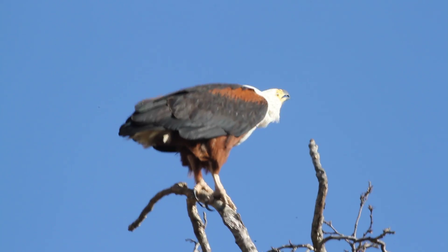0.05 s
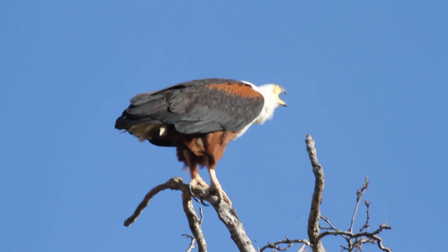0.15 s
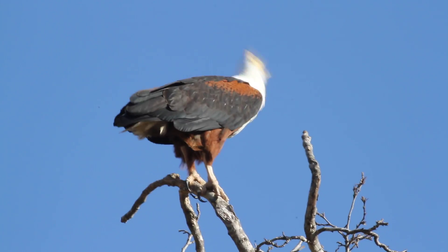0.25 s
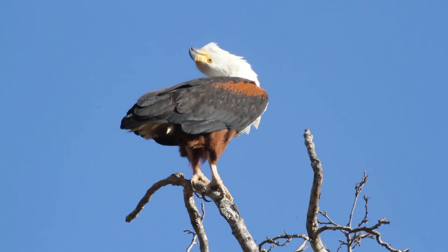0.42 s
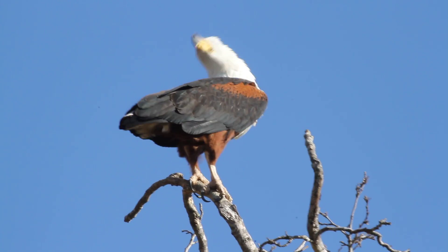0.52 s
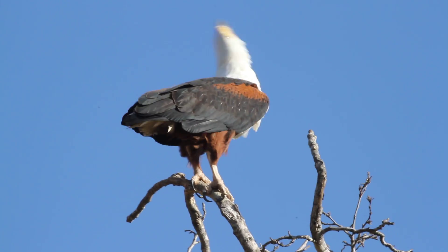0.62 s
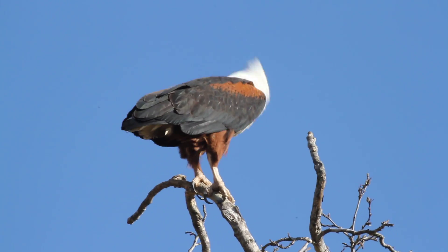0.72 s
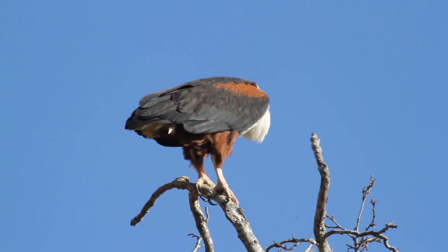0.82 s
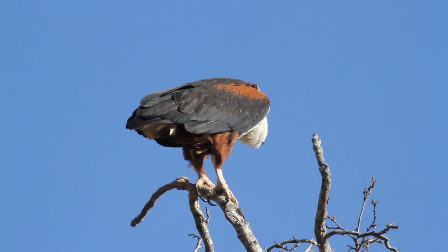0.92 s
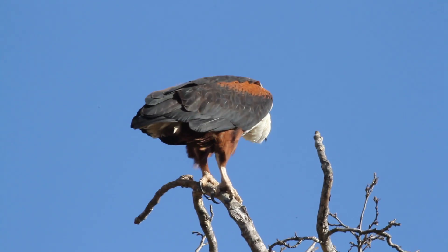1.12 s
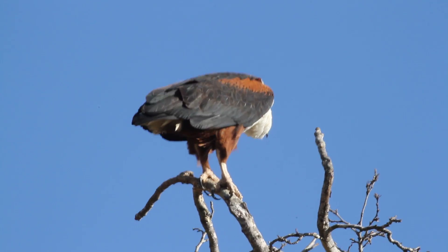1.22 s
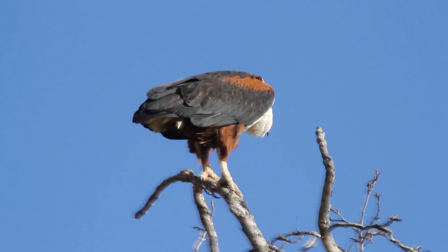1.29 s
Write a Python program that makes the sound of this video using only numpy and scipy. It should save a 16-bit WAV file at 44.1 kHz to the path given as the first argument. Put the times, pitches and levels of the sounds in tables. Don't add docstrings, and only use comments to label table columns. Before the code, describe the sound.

Large bird of prey gives two loud joined piercing yelps, then a softer, purer third note

```python
import sys
import numpy as np
from scipy import signal
from scipy.io import wavfile
from scipy.ndimage import uniform_filter1d

SR = 44100
rng = np.random.default_rng(int(sys.argv[2]) if len(sys.argv) > 2 else 0)


def waveform_to_disk(signal):
    frames = np.transpose(np.atleast_2d(signal))
    scaled = np.clip(frames, -1, 1) * 32767
    samples = np.round(scaled).astype(np.int16)
    wavfile.write(sys.argv[1], SR, samples)


def volts(x):
    e = np.asarray(x, float) / 20
    return 10 ** e


N = 59535
LEAD = 22050

# multiple of the pitch, level in dB.
YELP_TONE = [(1, 0), (2, -24), (3, -32), (4, -28.5), (5, -41), (6, -45), (7, -46.5), (8, -40.5), (9, -43.5),
             (10, -46.5), (11, -56)]


def rms_one(x):
    return x / np.sqrt(np.mean(x ** 2) + 1e-20)


def clock():
    return (np.arange(N + LEAD) - LEAD) / SR


def drift(rate_hz, count=N + LEAD):
    r = np.exp(-2 * np.pi * rate_hz / SR)
    white = rng.standard_normal(count + 4000)
    smooth = signal.lfilter([1], [1, -2 * r, r * r], white)
    return rms_one(smooth[4000:])


def highpass(x, order, hz):
    return signal.sosfilt(signal.butter(order, hz, "high", fs=SR, output="sos"), x)


def bandpass(x, order, low_hz, high_hz):
    return signal.sosfilt(signal.butter(order, [low_hz, high_hz], "band", fs=SR, output="sos"), x)


def coloured(spectrum, patchy_db=0):
    hz, db = np.transpose(spectrum)
    count = int(3 * np.log2(hz[-1] / hz[0])) + 2
    edges = np.geomspace(hz[0], hz[-1], count)
    white, out = rng.standard_normal((2, N + LEAD)), 0
    for k, (low, high) in enumerate(zip(edges, edges[1:])):
        band = bandpass(white[k % 2], 2, low, high)
        middle = np.log(low * high) / 2
        level_db = np.interp(middle, np.log(hz), db) + patchy_db * drift(3.7)
        out = out + band * volts(level_db)
    return rms_one(out)


def note(rows, tone, breath, waver_db, flares=(), flares_db=(), size=200):
    jitter, jitter_hz = 0.0022, 78.4
    shimmer_db, shimmer_hz, overtone_shimmer_hz = .3, 60, 30
    breath_db, breath_opens = -45, 0.22
    s, *columns = np.transpose(rows)
    on = (clock() > s[0] - .01) & (clock() < s[-1] + .01)
    t = clock()[on]
    hz, db, open_db, tilt = [uniform_filter1d(np.interp(t, s, c), size=130) for c in columns]

    pitch = uniform_filter1d(hz, size=size) * (1 + jitter * drift(jitter_hz, len(t)))
    phase = 2 * np.pi * np.cumsum(pitch) / SR
    voice = np.sin(phase) * volts(shimmer_db * drift(shimmer_hz, len(t)))
    voice = voice + volts(breath_db + breath_opens * open_db) * breath[on]
    for k, k_db in tone[1:]:
        waver = waver_db * drift(overtone_shimmer_hz, len(t))
        for (start, length, multiple), flare_db in zip(flares, flares_db):
            if round(multiple) == k:
                swing = np.sin(np.pi * np.clip((t - start) / length, 0, 1))
                waver = waver + flare_db * np.abs(swing) ** .5
        overtone = np.sin(k * phase + rng.uniform(0, 2 * np.pi))
        voice = voice + overtone * volts(k_db + open_db + tilt * np.log2(k / 2) + waver)

    gate = uniform_filter1d(1. * ((t > s[0]) & (t < s[-1])), size=130)
    out = np.zeros(N + LEAD)
    out[on] = np.sqrt(2) * gate * volts(db) * voice
    return out


def arch(breath):
    # time in s, pitch in Hz, level in dB, overtone gain in dB, overtone tilt in dB per octave.
    arch_rows = [
        (.2, 927, -38.5, 23, -20),
        (.209, 1031, -36, 21.5, -4.5),
        (.219, 1192, -25.5, 11, -6),
        (.231, 1324, -20, 8.5, -5),
        (.239, 1342, -12.5, 3.5, -4.5),
        (.271, 1412, -11.5, -4, 7),
        (.299, 1376, -8.5, -2, 0),
        (.318, 1307, -11, 2, 1),
        (.332, 1205, -28, 7, -5),
    ]
    tail_rows = [
        (.33, 1223, -32.5, 15, -11.5),
        (.338, 1245, -17, 6, -15.5),
        (.346, 1224, -18, 2, -13),
        (.353, 1184, -32.5, 2.3, -10),
    ]
    # multiple of the pitch, level in dB.
    arch_tone = [(1, 0), (2, -18), (3, -20), (4, -28.5), (5, -32), (6, -36.5), (7, -42), (8, -40),
                 (9, -41.5), (10, -35), (11, -53)]
    # start in s, length in s, multiple of the pitch.
    arch_flares = [(.203, .011, 2), (.215, .006, 2), (.225, .006, 2), (.2, .01, 3), (.216, .005, 3),
                   (.219, .008, 3), (.25, .05, 6), (.3, .035, 5), (.235, .08, 7), (.212, .04, 8),
                   (.212, .035, 9), (.25, .05, 10), (.24, .06, 11)]
    arch_flare_gains = [1.5, -5, -14, -19.5, -4.5, 9.5, 4, -2, 11, 19, 8, -3, 6]
    main = note(arch_rows, arch_tone, breath, waver_db=1.5, flares=arch_flares,
                flares_db=arch_flare_gains, size=700)
    return main + note(tail_rows, arch_tone, breath, waver_db=1.5)


def yelp(breath):
    # time in s, pitch in Hz, level in dB, overtone gain in dB, overtone tilt in dB per octave.
    yelp_rows = [
        (.347, 1593, -10.5, -1, -8.5),
        (.354, 1491, -9.5, -0.5, -11.5),
        (.375, 1420, -8, -6, -3),
        (.396, 1345, -13.5, -7.5, 4),
        (.404, 1463, -21.5, -3, -4),
        (.425, 1464, -24, 4.5, -4),
        (.482, 1443, -26, 4, -2.5),
        (.494, 1349, -26.5, -2.5, 0.5),
        (.511, 1341, -35, -16, -13),
    ]
    # start in s, length in s, multiple of the pitch.
    yelp_flares = [(.357, .02, 2), (.345, .012, 2), (.38, .016, 2), (.4, .03, 3), (.466, .036, 3),
                   (.345, .04, 4), (.48, .018, 4), (.405, .07, 5), (.478, .022, 6), (.348, .025, 7),
                   (.348, .02, 8), (.398, .055, 8), (.405, .085, 9), (.42, .07, 10), (.37, .02, 11)]
    yelp_flare_gains = [4.5, -5.5, -15, 9, 15.5, -5, 9.5, 14, 23, 26, 18.5, 15.5, 8, 17.5, 9]
    return note(yelp_rows, YELP_TONE, breath, waver_db=2, flares=yelp_flares, flares_db=yelp_flare_gains)


def soft_note(breath):
    # time in s, pitch in Hz, level in dB, overtone gain in dB, overtone tilt in dB per octave.
    soft_rows = [
        (.599, 1127, -45.5, 4, -6),
        (.61, 1196, -24.5, 4, 8.5),
        (.623, 1115, -24.5, 2.5, 1.5),
        (.632, 1218, -15, 2.5, 3),
        (.665, 1232, -15.5, -6.5, -1),
        (.7, 1206, -18, -5, 5.5),
        (.74, 1163, -17, -7, 3.5),
        (.776, 1113, -23.5, 0, 6.5),
        (.79, 1087, -32.5, 6, 1.5),
    ]
    # multiple of the pitch, level in dB.
    soft_tone = [(1, 0), (2, -47.5), (3, -48), (4, -44.5), (5, -55), (6, -53.5), (7, -59.5), (8, -79),
                 (9, -57.5), (10, -63), (11, -78.5)]
    # start in s, length in s, multiple of the pitch.
    soft_flares = [(.622, .045, 2), (.766, .025, 2), (.6, .04, 3), (.71, .036, 3), (.755, .035, 3),
                   (.635, .05, 4), (.705, .04, 4), (.75, .05, 4), (.745, .042, 5), (.625, .032, 6),
                   (.72, .02, 6), (.75, .032, 6), (.765, .015, 7), (.63, .05, 9), (.715, .025, 9)]
    soft_flare_gains = [15.5, 19.5, -11.5, 18.5, 15, 18.5, 16, -10, 16, 13, 14.5, 5, 14.5, 9, 8.5]
    return note(soft_rows, soft_tone, breath, waver_db=1.5, flares=soft_flares, flares_db=soft_flare_gains)


def cracks():
    # start in s, length in s, from pitch in Hz, to pitch in Hz, level in dB.
    crack_rows = [(.2, .014, 1450, 1440, -38), (.338, .0095, 1730, 1720, -15), (.53, .028, 940, 960, -48),
                  (.558, .025, 960, 930, -47), (.599, .012, 980, 930, -34), (.606, .023, 930, 900, -27),
                  (.604, .012, 1950, 2000, -43), (.614, .012, 1800, 1900, -41),
                  (.788, .011, 1040, 940, -27), (.797, .02, 960, 740, -46), (.822, .021, 1170, 1180, -42),
                  (.8, .022, 1100, 1150, -46), (.79, .036, 3400, 3440, -55), (.13, .051, 900, 940, -57),
                  (.86, .03, 1190, 1100, -52), (.895, .05, 1180, 1130, -52), (.835, .045, 1460, 1360, -53),
                  (.91, .04, 1400, 1460, -55), (.53, .06, 1400, 1440, -46)]
    # start in s, length in s, level in dB.
    rasp_rows = [
        (.2, .025, -47),
        (.338, .02, -44),
        (.605, .027, -46),
        (.785, .015, -60),
    ]
    # frequency in Hz, level in dB per Hz.
    joint_rasp = [(1500, 3), (3000, -5.5), (5500, -11.5), (8000, -18.5), (12000, -21), (16000, -29.5)]
    rough, flutter_hz = .28, 90
    t, out, rasp = clock(), 0, coloured(joint_rasp)
    flutter = 1 + rough * drift(flutter_hz)
    wobble = rough * drift(flutter_hz)
    for s, length, from_hz, to_hz, db in crack_rows:
        u = np.clip((t - s) / length, 0, 1)
        phase = 2 * np.pi * length * (from_hz * u + (to_hz - from_hz) * u * u / 2) + wobble
        voice = np.sin(phase) + volts(-36) * np.sin(2 * phase)
        swell = np.abs(np.sin(np.pi * u ** 1.5)) ** 0.66
        out = out + volts(db + 3.5) * swell * flutter * voice
    for s, length, db in rasp_rows:
        swell = np.sin(np.pi * np.clip((t - s) / length, 0, 1))
        out = out + volts(db) * swell * rasp
    return out


def earlier_cry(breath):
    # time in s, pitch in Hz, level in dB, overtone gain in dB, overtone tilt in dB per octave.
    earlier_rows = [
        (-.34, 1150, -37, -0.7, 0.044),
        (-.3, 1233, -4.5, -11.5, 0.015),
        (-.2, 1406, -10, -1.3, 0),
        (-.1, 1468, -22, -4.5, 0),
        (-.06, 1300, -45.5, -5, 0),
    ]
    return note(earlier_rows, YELP_TONE, breath, waver_db=4.5)


def far_echo(breath):
    # time in s, pitch in Hz, level in dB, overtone gain in dB, overtone tilt in dB per octave.
    far_rows = [
        (0, 1471, -54.5, 8.3, -6),
        (.1, 1508, -52, 16.3, -31),
        (.17, 1484, -51.5, 14.2, -20),
        (.2, 1400, -64, 10, -8),
    ]
    return note(far_rows, YELP_TONE[:3], breath, waver_db=3.0)


def open_land(x):
    near_db, near_t60_s = -27, 0.18
    far_db, far_t60_s, far_start_s = -34.5, 1.2, 0.037
    t = np.arange(SR * 3 // 2) / SR
    near, far = rng.standard_normal((2, len(t)))
    near = near * volts(-60 * t / near_t60_s) * (t > .002)
    far = far * volts(-60 * t / far_t60_s) * np.clip(t / far_start_s, 0, 1)
    echo = volts(near_db) * near / np.linalg.norm(near) + volts(far_db) * far / np.linalg.norm(far)
    echo = signal.sosfilt(signal.butter(1, 11000, fs=SR, output="sos"), echo)
    return signal.fftconvolve(x, echo)[:len(x)]


def bumps():
    # start in s, level in dB, decay in s.
    bump_rows = [
        (.712, -56, .03),
        (.075, -55, .02),
        (1.27, -53, .015),
        (1.3, -49, .012),
        (.35, -54, .02),
    ]
    low_hz, high_hz = 184, 530
    t, white = clock(), rng.standard_normal(N + LEAD)
    shape = sum(volts(db) * (t > s) * np.exp(-np.abs(t - s) / decay) for s, db, decay in bump_rows)
    return bandpass(shape * white, 3, low_hz, high_hz) / np.sqrt(2 * (high_hz - low_hz) / SR)


def knocks():
    # start in s, frequency in Hz, peak level in dB.
    knock_rows = [
        (.711, 221, -39),
        (.711, 554, -37.5),
        (.711, 754, -49),
        (.72, 361, -35),
        (0.737, 227.6, -36),
        (.737, 513, -56.5),
    ]
    t60_s, rise_s = 0.08, 0.0016
    t, rings = clock(), 0
    for s, hz, db in knock_rows:
        fade = volts(db + 4.5 - 60 * np.abs(t - s) / t60_s)
        rise = 1 - np.exp(-np.clip(t - s, 0, 9) / rise_s)
        rings = rings + fade * rise * np.sin(2 * np.pi * hz * (t - s))
    return highpass(rings, 4, 160)


def tick():
    start_s, decay_s, level_db, low_hz = .711, .006, -46, 3300
    t = clock()
    shape = volts(level_db) * (t > start_s) * np.exp(-np.abs(t - start_s) / decay_s)
    white = rng.standard_normal(N + LEAD) * shape
    return bandpass(white, 2, low_hz, 2.2 * low_hz) + volts(-10.5) * white


def hum():
    # frequency in Hz, level in dB per Hz.
    hum_colour = [(15, -53.5), (25, -31), (117, -19), (178, -14.5), (245, -13), (305, -8.5), (334, -6),
                  (499, -3.5), (700, -9.5), (1000, -39.5), (1300, -70), (2200, -120)]
    return volts(-52) * coloured(hum_colour, patchy_db=0.4)


def hiss():
    # frequency in Hz, level in dB per Hz.
    hiss_colour = [(530, -39), (900, -42), (1090, -5.5), (1320, -4), (1720, -13), (4630, -15), (15700, -22)]
    return volts(-58) * coloured(hiss_colour, patchy_db=.3)


def scene():
    # frequency in Hz, level in dB per Hz.
    breath_colour = [(1500, -6.5), (3000, -3), (6000, -17), (12000, -24), (16000, -21)]
    breath = coloured(breath_colour)
    eagle = arch(breath) + yelp(breath) + soft_note(breath) + earlier_cry(breath)
    eagle = highpass(eagle, 4, 600)
    second = highpass(cracks(), 4, 600)
    beamed = highpass(eagle, 6, 1887)
    echoes = open_land(eagle + volts(-4) * second + volts(18.5) * beamed)
    mix = eagle + second + echoes + far_echo(breath)
    mix = mix + bumps() + knocks() + tick() + hum() + hiss()
    return mix[None, LEAD:]


def roll_off(x):
    return signal.sosfilt(signal.butter(12, 15790, fs=SR, output="sos"), x)


def record(dry):
    x = highpass(dry, 2, 15)
    x = signal.sosfilt(signal.ellip(10, .5, 60, 15800, fs=SR, output="sos"), x)
    return roll_off(x)


dry = scene()
out = record(dry)
waveform_to_disk(out)
```